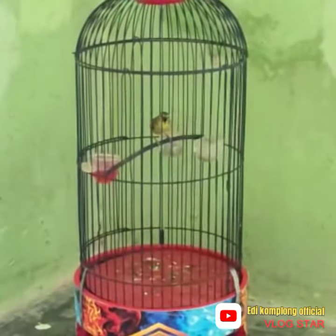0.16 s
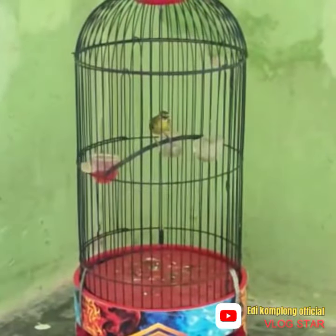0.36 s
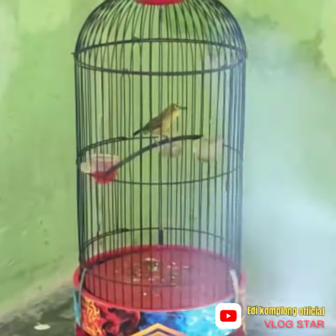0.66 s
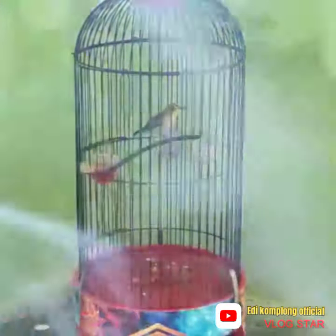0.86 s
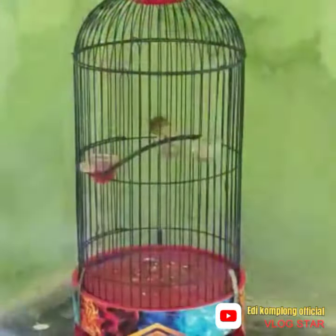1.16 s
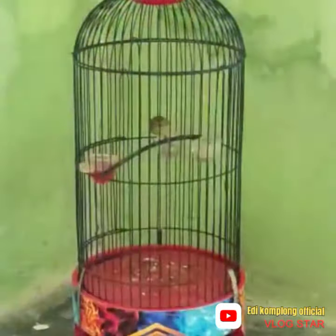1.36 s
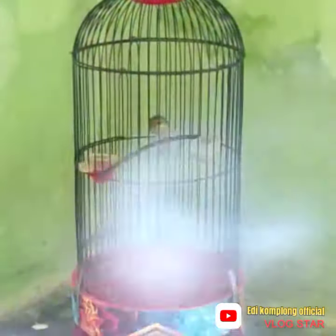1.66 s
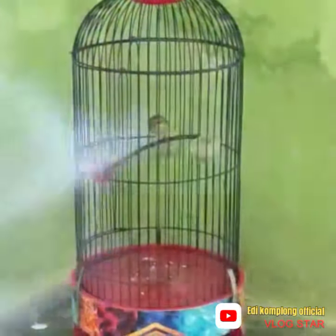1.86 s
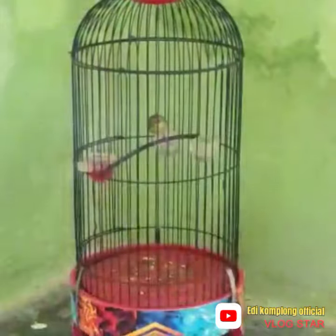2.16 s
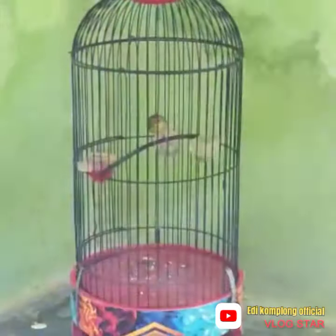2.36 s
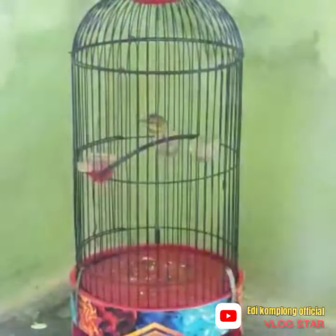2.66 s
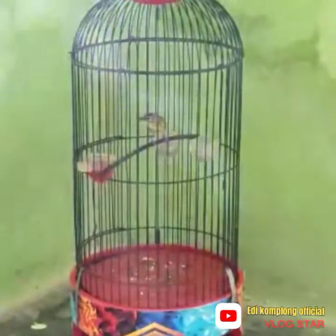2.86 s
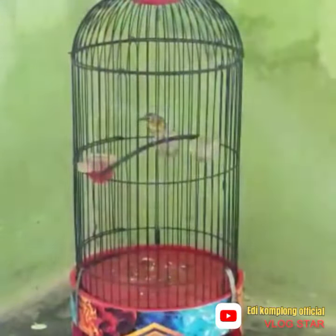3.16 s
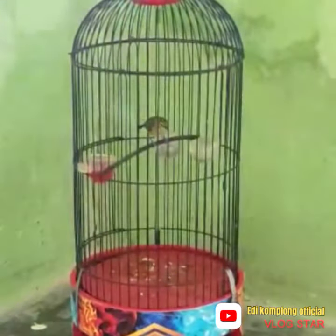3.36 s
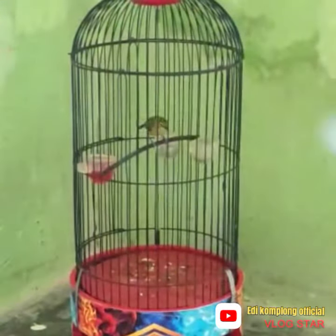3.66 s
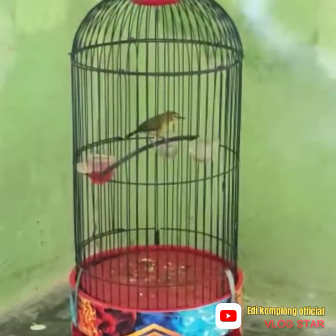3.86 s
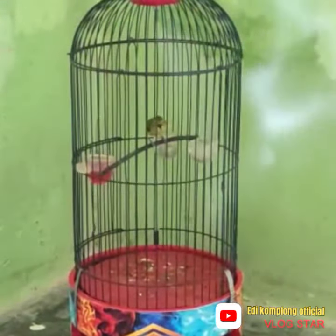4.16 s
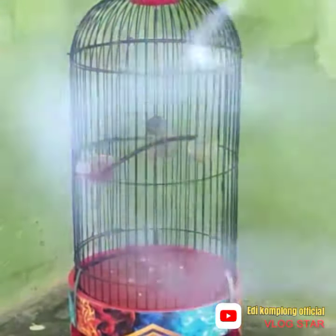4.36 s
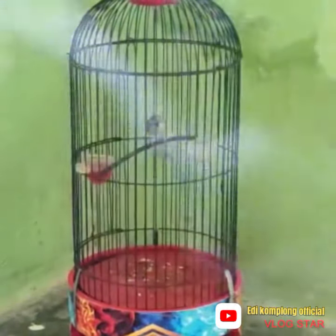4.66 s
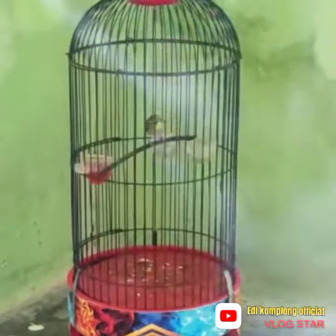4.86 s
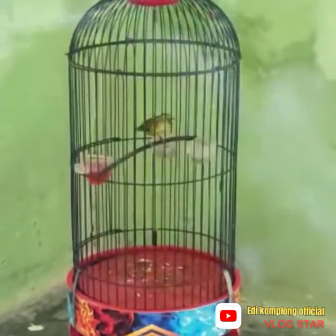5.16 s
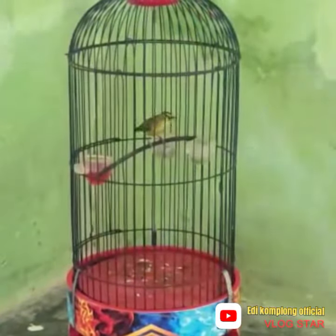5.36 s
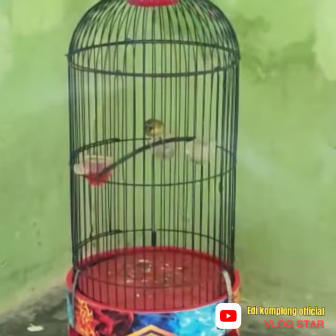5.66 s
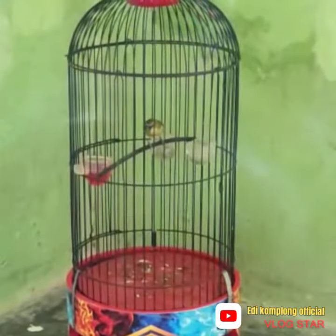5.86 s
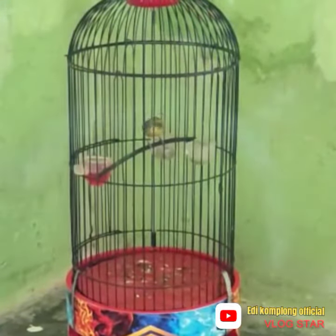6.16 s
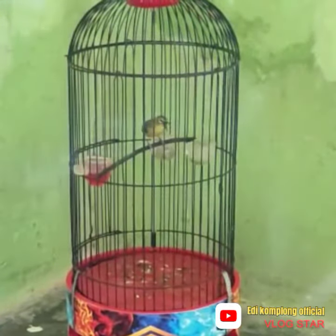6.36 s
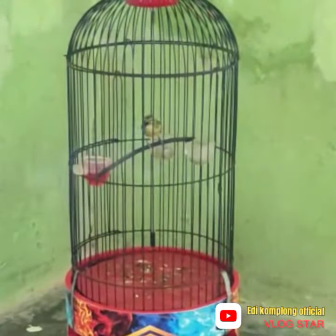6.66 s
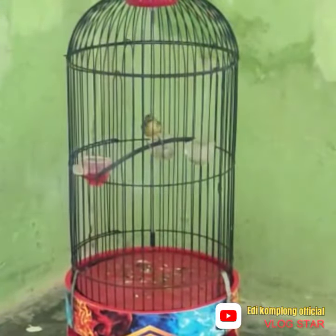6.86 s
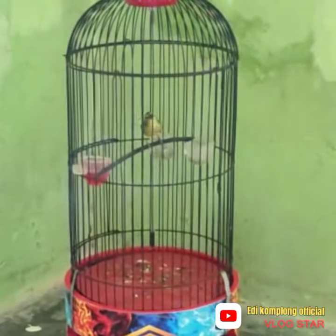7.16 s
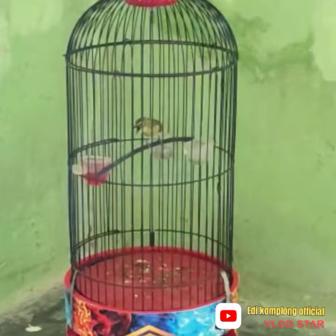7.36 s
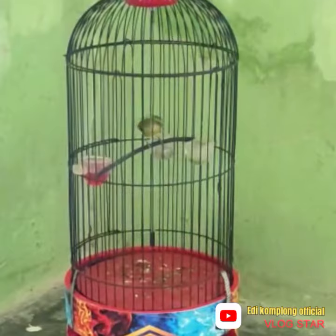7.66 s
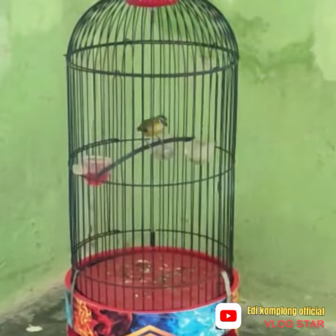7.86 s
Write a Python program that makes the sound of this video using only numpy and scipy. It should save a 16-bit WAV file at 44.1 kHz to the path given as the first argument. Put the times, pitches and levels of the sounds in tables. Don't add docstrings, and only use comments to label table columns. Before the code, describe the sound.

In a bare, hard-walled room, a small caged bird sings loudly, each whistle trailing bright ringing echoes. From 0 to 0.8 seconds come two leaping chirps, two quick rises, a loud lower hook and a steep fall. Then it mostly rests: a farther bird gives faint falling calls and cheeps from 1.1 to 4.3, a dove coos barely audibly around 1.5 to 2.8, and the near bird adds a drooping whistle at 2.6 and a high tip at 2.9. Wings rustle softly at 4.0 and 5.4. A sharp tick and high tip come near 4.3, then six downward sweeps lengthen until 5.7. A buzzing, rattling trill of eight fast beats runs 5.8 to 6.2. Five rising whistles follow from 6.3, a soft hook at 6.9, and five quick falls from 7.1 to 8.0. Quiet low rumble and thin leafy hiss remain underneath, on slightly overloaded phone microphones.

```python
import sys
import numpy as np
from scipy import signal
from scipy.fft import rfft, irfft, next_fast_len
from scipy.io import wavfile
from scipy.ndimage import uniform_filter1d, minimum_filter1d

SR = 44100
rng = np.random.default_rng(int(sys.argv[2]) if len(sys.argv) > 2 else 0)


def inscribe(sig):
    pcm = np.round(np.clip(np.atleast_2d(sig).T, -1, 1) * 32767)
    wavfile.write(sys.argv[1], SR, pcm.astype(np.int16))


def to_linear_factor(level_db):
    exponent = np.asarray(level_db, float) / 20
    return 10 ** exponent


N = 353682

# (time [s], length [s], first pitch [Hz], last pitch [Hz], level [dB])
SLOW_FALLS = [
    (4.38, 0.065, 6500, 4990, -10),
    (4.5, 0.15, 7314, 3403, -10.5),
    (4.745, 0.15, 7500, 3612, -10),
    (5.04, 0.2, 7255, 2105, -8),
    (5.27, 0.22, 7250, 2102, -8),
    (5.52, .185, 7010, 2503, -7),
]
QUICK_FALLS = [
    (.667, .138, 7170, 2100, -11),
    (7.13, .13, 7028, 2135, -11.5),
    (7.325, .13, 6977, 2112, -10),
    (7.505, .138, 7050, 2090, -11),
    (7.69, .14, 6960, 2096, -12),
    (7.865, .146, 6948, 2212, -11.5),
]
RISES = [
    (.265, 0.084, 3830, 6273, -13),
    (.382, 0.071, 3713, 6200, -12.5),
    (6.275, 0.1, 3615, 6290, -10.5),
    (6.436, 0.097, 3697, 6500, -12.5),
    (6.6, 0.073, 3653, 6574, -12.5),
    (6.73, .072, 3935, 6410, -12),
    (6.85, 0.076, 3996, 6244, -11.5),
]
LEAPS = [
    (.035, .085, 4330, 5960, -9.5),
    (.165, .085, 4200, 6243, -9),
]
HOOKS = [
    (.497, .105, 3396, 4315, -6.5),
    (6.94, 0.13, 3500, 4200, -13),
]
TIPS = [
    (2.9, .085, 7680, 5960, -12.5),
    (4.268, .085, 7947, 5500, -12.5),
]
EARLIER = [
    (.085, .085, 3800, 6250, -12),
]
# (share of length [0-1], share of glide [0-1], level [dB])
SLOW_FALL = [(0, 0, -2.5), (.35, .38, -4.5), (.68, .6, -2.5), (.87, .84, -3), (1, 0.95, -7.5)]
QUICK_FALL = [(0, 0, 0), (.31, 0.33, 1), (0.619, 0.68, 1), (0.842, 0.9, 0.5), (0.998, 0.92, 0)]
RISE = [(0, 0.034, -4), (.35, .48, 0), (0.618, .92, 0), (1, 0.98, -5.5)]
LEAP = [(0, 0.0098, -7), (0.421, 0.06, 0), (.7, 0.96, -1.5), (0.999, .92, -19)]
HOOK = [(0, 0, -16), (0.179, .45, -10), (.55, .92, 0.5), (1, 1.0, -18)]
TIP = [(0, .15, 4.5), (0.279, 0.034, -5.5), (.48, .6, 1), (1, 0.96, -3)]
# (time [s], pitch [Hz], level [dB])
SOLOS = [
    [(2.625, 9480, -29.5), (2.635, 6563, -18.5), (2.66, 5836, -20.5), (2.8, 5457, -14.5),
     (2.84, 5080, -24.5), (2.875, 4650, -49)],
    [(5.772, 10320, -1.5), (5.78, 6480, -21), (5.79, 5560, -14), (5.805, 5180, -21)],
]
# (time [s], level [dB])
TRILL = [
    (5.79, -15.5),
    (5.84, -10.5),
    (5.898, -10),
    (5.956, -13),
    (6.012, -13),
    (6.066, -12.5),
    (6.128, -10),
    (6.185, -11.5),
]
# (time after the beat [s], pitch [Hz], level [dB])
FALLS = [
    [(0, 7160, 2.5), (.008, 5668, 1), (.018, 4294, -1), (.024, 3140, -9)],
    [(.022, 6937, -6), (.032, 5967, -5), (.047, 4200, 1)],
]
# (pitch [Hz], level [dB])
FALL_VOICE = [(2100, -43), (2750, -35), (3100, -22), (3600, -10), (4500, -1.5), (5600, -3), (7200, 0)]
# (pitch [Hz], second [dB], third [dB])
OVERTONES = [(2965, -12.5, -43), (4200, -27, -30), (5500, -14, -40), (6500, -19.5, -50.5),
             (7500, -23, -81.5)]
HARSH_DB = [0, 1, [5.5, 6, -3.5, -5.5, -1, 4, 3], -3.5, [-0.5, 11.5], 9, [4, 25.5]]
# (frequency [Hz], level [dB])
BEAK = [(2200, 9.5), (2800, -6), (3400, 0.5), (4200, -4.5), (7000, 1.5), (9000, 0.5), (12000, -5),
        (14200, 7), (14900, -16)]
# (frequency [Hz], level [dB])
RATTLE = [(3000, -8.5), (7000, -0.1), (9000, 4.5), (11500, -7.5), (14000, -14)]
# (frequency [Hz], level [dB])
BREATH = [(1500, -54.5), (2500, -40), (3500, -30), (7000, -33), (8500, -32), (10000, -18), (12000, -19),
          (14200, -37), (14900, -76)]
# (time [s], length [s], first pitch [Hz], last pitch [Hz], level [dB])
FAR_FALLS = [
    (1.092, 0.15, 8000, 3965, -41.5),
    (1.757, 0.098, 8300, 4200, -36.5),
    (2.012, 0.15, 8184, 4030, -35),
    (2.18, 0.11, 8100, 3476, -36),
    (2.6, 0.14, 5580, 4200, -44.5),
    (3.245, 0.089, 7120, 3300, -35),
    (3.872, 0.19, 7780, 4110, -42),
    (4.17, 0.11, 6930, 4200, -34.5),
]
CHEEPS = [
    (1.4, 0.3, 4390, 4510, -62),
    (1.87, .13, 4760, 5500, -42.5),
    (2.87, .09, 3580, 3840, -65),
    (3.06, 0.12, 4310, 4450, -54),
    (3.45, .15, 4430, 4220, -76.5),
    (3.7, 0.095, 4420, 4510, -54),
]
COOS = [
    (1.46, .23, 538, 550, -57),
    (1.7, .12, 575, 600, -58),
    (1.85, .3, 610, 586, -63),
    (2.57, .25, 745, 800, -55),
]
HUMS = [
    (4.07, .17, 1075, 1075, -55),
    (2.63, .15, 1050, 1050, -61),
    (3.65, .35, 2480, 2480, -76),
]
# (share of length [0-1], share of glide [0-1], level [dB])
FAR_FALL = [(0, 0.2, 15), (0.351, .5, -9.5), (0.648, .8, -8.5), (1, 1, -4.5)]
CHEEP = [(0, 0, 4), (1, 1, -19.5)]
COO = [(0, 0, 0), (.6, .8, -3), (1, 1, -9)]
# (frequency [Hz], time to fade by 60 dB [s])
ROOM = [(600, 0.42), (2300, 0.45), (3200, 0.76), (5000, 0.72), (7000, 0.56), (10000, 0.74), (14000, 0.49)]
# (time [s], rise [s], hold [s], fall [s], level [dB])
RUSTLE = [
    (4.0, 0.081, .19, 0.088, -47),
    (5.42, 0.099, 0.32, 0.038, -49),
]
# (frequency [Hz], level [dB per Hz])
FEATHERS = [(59, -23.5), (100, -16.5), (252, -8), (780, -20), (1070, -18.5), (3310, -20), (3680, -20.5),
            (6480, -13), (12200, -34.5), (14100, -20), (15000, -43.5)]
# (time [s], rise [s], hold [s], fall [s], level [dB])
LEAVES = [
    (.95, 0.035, .02, 0.12, -56),
    (1.08, 0.021, 0.13, 0.18, -51),
    (1.74, 0.093, .03, 0.49, -53.5),
    (2.05, 0.14, .03, 0.14, -49),
    (3.2, 0.096, .02, 0.22, -48.5),
    (3.8, 0.33, 0.0059, 0.18, -44),
    (4.256, 0.018, 0.0055, .002, -25),
]
# (frequency [Hz], level [dB per Hz])
LEAF = [(5180, -38), (8800, -0.5), (9190, 4), (9900, 0.5), (11200, 6.5), (14100, -24), (14800, -34)]
# (frequency [Hz], level [dB per Hz])
AIR = [(12, -50), (20, 11), (173, -15), (470, -18.5), (732, -20), (1240, -24), (1680, -23.5), (3970, -30),
       (4310, -19), (5850, -35.5), (8610, -29), (13800, -30), (15000, -50.5)]
# (frequency [Hz], likeness [0-1])
ALIKE = [(40, 0.77), (200, 0.7), (600, 0.47), (1200, 0.01)]
# (frequency [Hz], level [dB])
BUZZ = [(3000, -55), (7500, -29.5), (9500, -36), (12000, -23.5), (14200, -5), (14900, -45)]
# (frequency [Hz], level [dB])
CAPSULE = [(22, -15), (33, 4), (42, -4.5), (52, -18), (80, 0), (14100, 0.82), (14600, -14), (15000, -42)]
# (frequency [Hz], level [dB])
RIGHT_PORT = [(7000, 0), (9000, 6.5), (11000, -10.5), (14000, -10.5)]

CLOSING_DB = -14
WALL_S = .011
LEAD = 8192
BURST_DEPTH_DB = -19
AIR_DB = -54
RUMBLE_SWELL_DB, RUMBLE_PER_S = -1.75, 3.3


def song():
    kinds = [
        notes(SLOW_FALLS, SLOW_FALL, FALL_VOICE),
        notes(QUICK_FALLS, QUICK_FALL, FALL_VOICE),
        notes(RISES, RISE),
        notes(LEAPS, LEAP),
        notes(HOOKS, HOOK),
        notes(TIPS, TIP),
        SOLOS,
    ]
    bird = np.zeros(N)
    for kind, harsh_db in zip(kinds, HARSH_DB):
        bird += whistle(kind, harsh_db, wobble=.014, flutter_db=2.5, edge_s=.004)
    return bird + shape(trill(), RATTLE, to_linear_factor)


def trill():
    beats = []
    for start, level_db in TRILL:
        for fall in FALLS:
            detune = 1 + 0.0254 * rng.standard_normal()
            beats.append(np.add(fall, (start, 0, level_db)) * (1, detune, 1))
    return whistle(beats, harsh_db=12, wobble=.045, flutter_db=4.0, edge_s=.002)


def notes(rows, outline, voice=((1, 0), (2, 0))):
    when, glide, db = np.transpose(outline)
    voice_hz, voice_db = np.transpose(voice)
    tables = []
    for start, length, first, last, level_db in rows:
        pitch = first + (last - first) * glide
        level = level_db + db + np.interp(pitch, voice_hz, voice_db)
        tables.append(np.c_[start + length * when, pitch, level])
    return tables


def whistle(tables, harsh_db, wobble, flutter_db, edge_s):
    out = np.zeros(N)
    base, second, third = np.transpose(OVERTONES)
    for table, extra_db in zip(tables, np.broadcast_to(harsh_db, len(tables))):
        s, hz, db = np.transpose(table)
        first = max(int(s[0] * SR), 0)
        t = np.arange(first, min(int(s[-1] * SR), N)) / SR
        shake = wander(305.0, count=SR)[:len(t)]
        flutter = wander(200., count=SR)[:len(t)]
        pitch = np.interp(t, s, hz) * (1 + wobble * shake)
        phase = 2 * np.pi * np.cumsum(pitch) / SR
        tone = np.sin(phase)
        falling = hz[-1] < hz[0]
        extra_db = extra_db + CLOSING_DB * falling * (t - s[0]) / (s[-1] - s[0])
        for k, overtone_db in ((2, second), (3, third)):
            strength = to_linear_factor(np.interp(pitch, base, overtone_db) + extra_db)
            audible = k * pitch < .45 * SR
            tone += strength * audible * np.sin(k * phase)
        edge = np.clip(np.minimum(t - s[0], (s[-1] - t) / 2.3) / edge_s, 0, 1)
        level = to_linear_factor(np.interp(t, s, db) + flutter_db * flutter)
        out[first:first + len(t)] += np.sqrt(2) * tone * edge ** 2 * level
    return out


def rasp(bird):
    effort = np.sqrt(uniform_filter1d(bird ** 2, size=128) + 1e-12)
    return shape(effort * rng.standard_normal(N), BREATH, to_linear_factor)


def near_bird():
    bird = song()
    voice = shape(bird, BEAK, to_linear_factor) + rasp(bird)
    rise = notes(EARLIER, RISE)
    earlier = whistle(rise, harsh_db=3, wobble=.014, flutter_db=2.5, edge_s=.004)[:LEAD]
    heard = room(np.r_[earlier, voice], direct_db=-6.5, early_db=1, early_s=0.019, build_s=0.005)
    return heard[:, LEAD:] * to_linear_factor(-2.0)


def distant_voices():
    calls = notes(FAR_FALLS, FAR_FALL) + notes(CHEEPS, CHEEP)
    far = whistle(calls, harsh_db=-12, wobble=.03, flutter_db=2.5, edge_s=.02)
    far += whistle(notes(COOS + HUMS, COO), harsh_db=-8, wobble=.004, flutter_db=2.5, edge_s=.03)
    return room(far, direct_db=-18, early_db=-5, early_s=.04, build_s=.02)


def room(x, direct_db, early_db, early_s, build_s):
    t = np.arange(SR) / SR
    hz, t60 = np.transpose(ROOM)
    noise = rng.standard_normal((2, SR))
    tail = 0
    for k in range(len(hz)):
        band = shape(noise, np.c_[hz, np.arange(len(hz)) == k], lambda share: share)
        tail = tail + band * to_linear_factor(-60 * t / t60[k])
    tail = tail * (1 - np.exp(-t / build_s))
    tail = tail / np.sqrt(np.sum(tail ** 2) / 2)
    early = rng.standard_normal((2, SR)) ** 3 * np.exp(-t / early_s)
    early *= np.where(t > WALL_S, 1, to_linear_factor(-4.5) * (t > 0))
    early = early / np.sqrt(np.sum(early ** 2) / 2)
    answer = tail + to_linear_factor(early_db) * early
    answer[[0, 1], [0, 4]] += to_linear_factor(direct_db)
    return signal.fftconvolve(x[None], answer, axes=1)[:, :len(x)]


def wings():
    grain = to_linear_factor(2.0 * wander(52.0, count=N))
    return hiss(FEATHERS, 1.0) * swell(RUSTLE) * grain


def air():
    steady = hiss(AIR, AIR_DB + 5.5)
    bass = shape(steady, [(1500, 1), (3000, 0)], lambda share: share)
    tide = to_linear_factor(RUMBLE_SWELL_DB * wander(RUMBLE_PER_S, count=N))
    stir = to_linear_factor(0.87 * wander(5.4, count=N))
    leaves = hiss(LEAF, -1.8) * swell(LEAVES)
    return (steady + bass * (tide - 1)) * stir + leaves


def hiss(colour, db):
    mid, side = rng.standard_normal((2, N))
    mid = shape(mid, ALIKE, lambda c: np.sqrt(1 + np.clip(c, 0, 1)))
    side = shape(side, ALIKE, lambda c: np.sqrt(1 - np.clip(c, 0, 1)))
    pair = shape(np.array([mid + side, mid - side]), colour, to_linear_factor)
    return pair * to_linear_factor(db) / pair.std()


def swell(bursts):
    t = np.arange(N) / SR
    gain = np.zeros(N)
    for start, rise, hold, fall, db in bursts:
        corners = start + np.cumsum([0, rise, hold, fall])
        depth = [BURST_DEPTH_DB, 0, 0, BURST_DEPTH_DB]
        gain += to_linear_factor(db + np.interp(t, corners, depth, left=-120, right=-120))
    return gain


def wander(rate, count):
    steps = rng.standard_normal(int(count / SR * 2000) + 4)
    return np.interp(np.arange(count) * min(rate, 2000) / SR, np.arange(len(steps)), steps)


def shape(x, points, gain):
    hz, value = np.transpose(points)
    length = x.shape[-1]
    size = next_fast_len(length, real=True)
    bins = np.maximum(np.arange(size // 2 + 1) * SR / size, 1)
    weight = gain(np.interp(np.log(bins), np.log(hz), value))
    return irfft(rfft(x, size) * weight, size)[..., :length]


def scene():
    return near_bird() + distant_voices() + wings() + air()


def limit(x, top, size):
    gain = np.minimum(1, top / (np.abs(x).max(axis=0) + 1e-9))
    return x * uniform_filter1d(minimum_filter1d(gain, size=2 * size), size=size)


def masked(x, below_db, up_db, down_db, scatter_db, size):
    _, _, spec = signal.stft(x, nperseg=2048, noverlap=1024, window="cosine")
    bands = 1024 // size
    power = (np.abs(spec[:, :-1]) ** 2).sum(axis=0)
    power = power.reshape(bands, size, -1).sum(axis=1)
    db = 10 * np.log10(power + 1e-20)
    above = np.arange(bands)[:, None] - np.arange(bands)
    fall = np.maximum(up_db * above, -down_db * above)
    shadow = np.max(db[None] - fall[:, :, None], axis=1) - below_db
    chance = uniform_filter1d(rng.standard_normal(db.shape), size=4, axis=1)
    keep = db > shadow + scatter_db * chance
    keep[:5] = True
    spec[:, :-1] *= np.repeat(keep, size, axis=0)
    return signal.istft(spec, nperseg=2048, noverlap=1024, window="cosine")[1][:, :N]


def low_pass(x):
    return signal.sosfilt(signal.butter(12, 15140, fs=SR, output="sos"), x)


def record(dry):
    haze = shape(dry ** 2, BUZZ, to_linear_factor)
    left, right = shape(dry + haze, CAPSULE, to_linear_factor)
    ports = np.array([left, shape(right, RIGHT_PORT, to_linear_factor)])
    ports = limit(ports, top=.92, size=256)
    thinned = masked(ports, below_db=23, up_db=.62, down_db=1.9, scatter_db=16, size=8)
    return low_pass(thinned)


dry = scene()
out = record(dry)
inscribe(out)
```